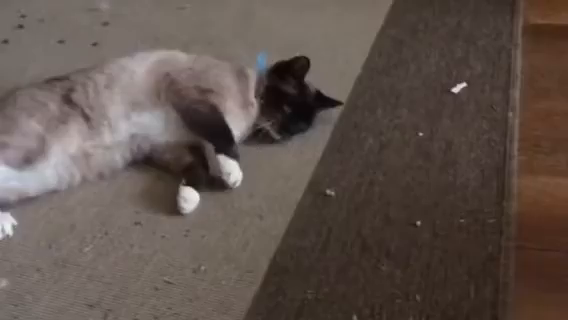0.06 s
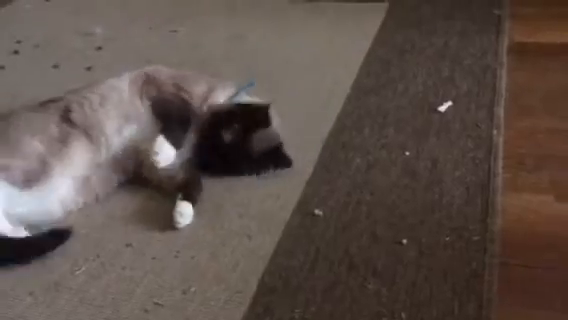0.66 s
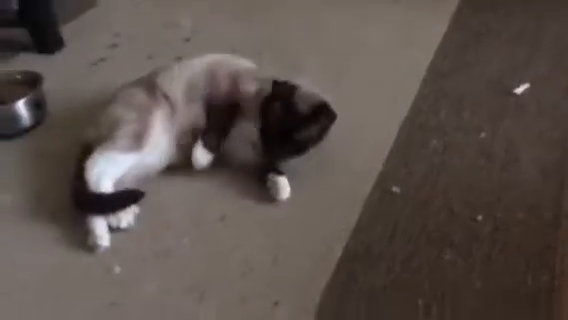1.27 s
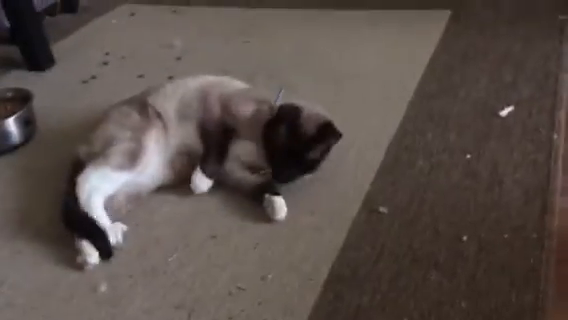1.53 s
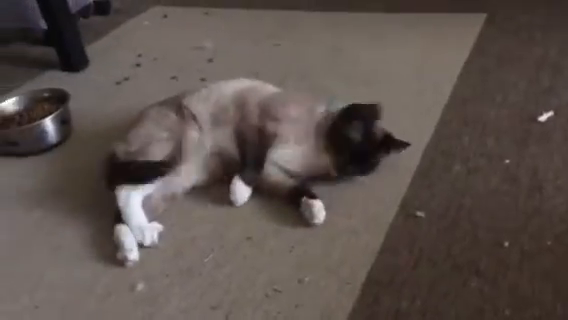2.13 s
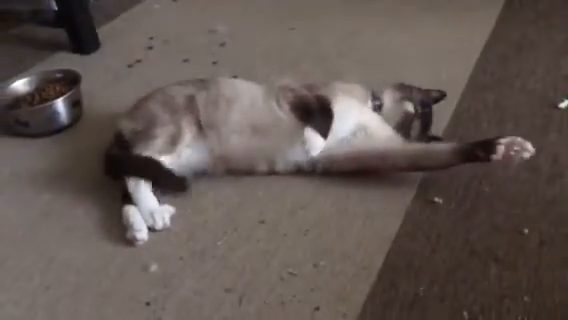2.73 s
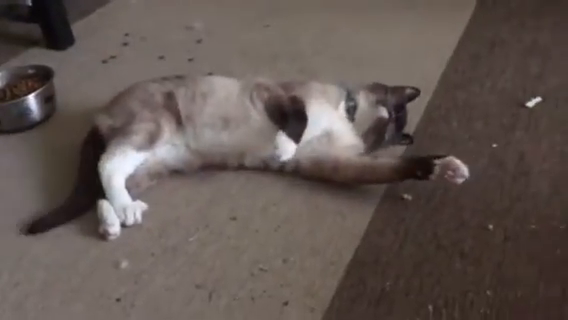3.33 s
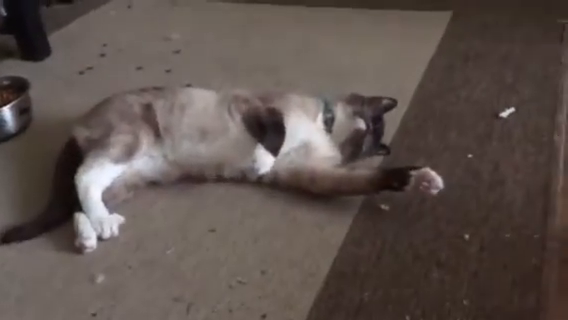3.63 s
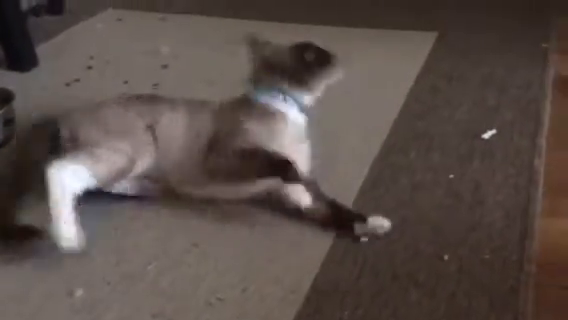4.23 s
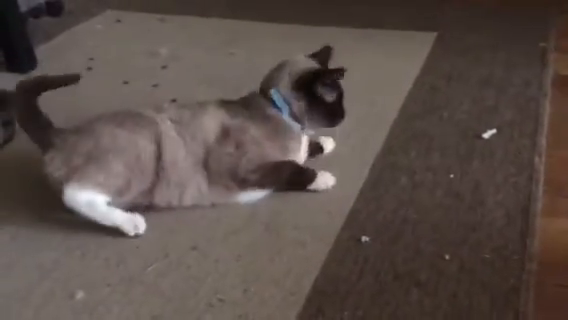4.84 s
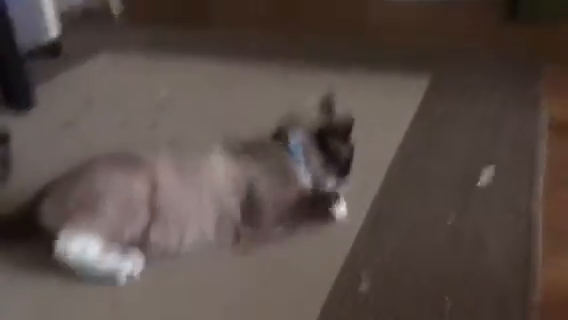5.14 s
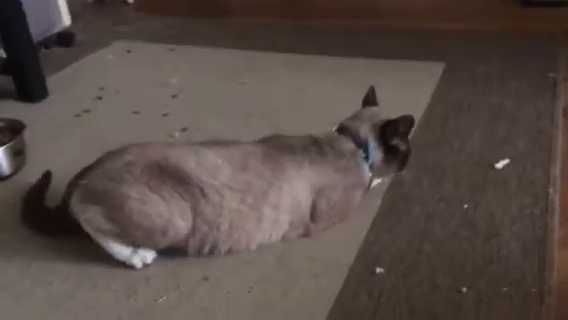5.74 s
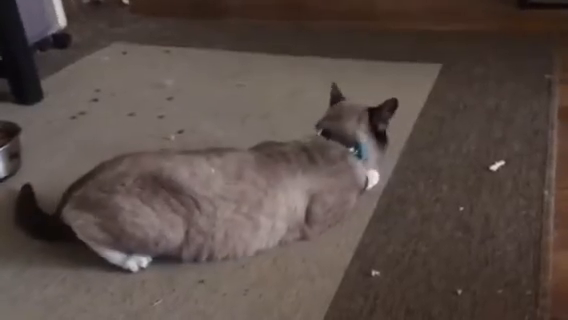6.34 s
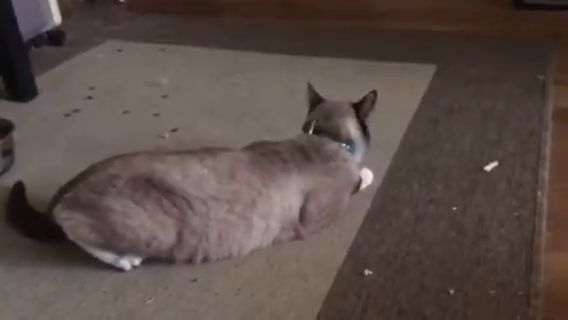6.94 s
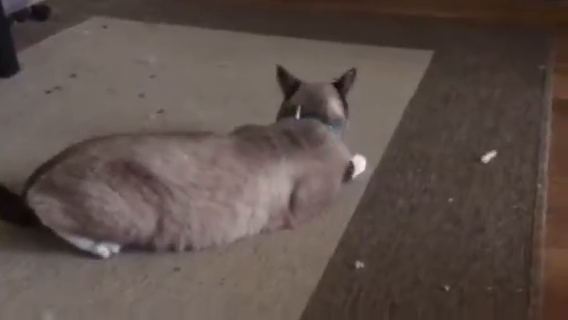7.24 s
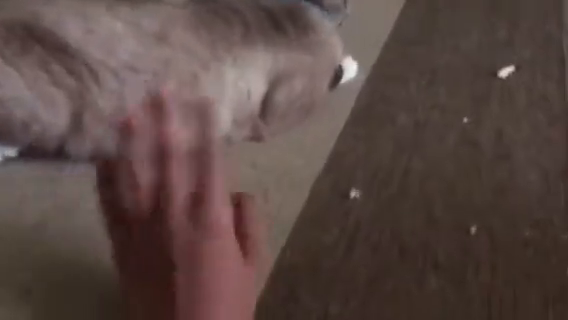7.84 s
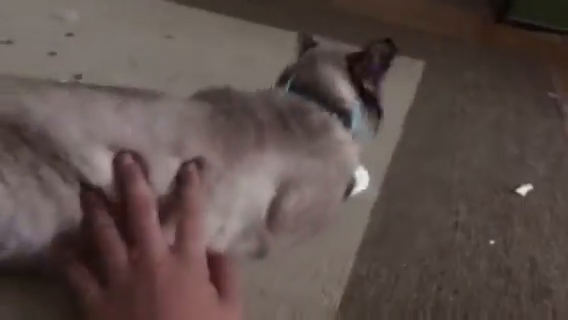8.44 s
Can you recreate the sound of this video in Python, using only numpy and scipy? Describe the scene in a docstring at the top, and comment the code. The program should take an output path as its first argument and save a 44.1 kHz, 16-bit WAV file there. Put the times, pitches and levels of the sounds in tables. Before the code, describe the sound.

A small bell on a cat's collar jingles briefly indoors, amid soft fur rustling, light bumps and a low room hum.

```python
'''A tiny bell on a cat's collar jingles as the cat rolls over on a carpet and sits up.
A loose pellet knocks the slit shell, bounces and rolls inside; the shell rings near 6.5 and 15.3 kHz.
Fur rubs the carpet, paws bump, the buckle clicks, and at the end a sleeve rustles as a hand reaches out.
A hand-held phone hears it all in a small room with mains hum, low rumble and an appliance's rush.'''
import sys
import numpy as np
from scipy import signal
from scipy.fft import rfft, irfft, next_fast_len
from scipy.io import wavfile

SR = 44100
rng = np.random.default_rng(int(sys.argv[2]) if len(sys.argv) > 2 else 0)


def transcribe(signal):
    """Save signal, clipped to [-1, 1], as a 16-bit WAV file at the path in sys.argv[1]."""
    frames = np.atleast_2d(signal).T
    limited = np.clip(frames, -1, 1)
    pcm = np.round(limited * 32767).astype(np.int16)
    wavfile.write(sys.argv[1], SR, pcm)


N = 374409
TIME = np.arange(N) / SR


def gain(db):
    """Turn decibels into a number to multiply by."""
    return 10 ** (np.asarray(db) / 20)


def unit(x):
    """Scale a sound to an average (rms) level of one."""
    return x / np.sqrt(np.mean(x ** 2))


def colour(x, points):
    """Shape a sound's tone with a curve through (pitch_hz, level_db) points."""
    hz, db = np.transpose(points)
    size = next_fast_len(len(x), real=True)
    pitches = np.maximum(np.fft.rfftfreq(size, 1 / SR), 1)
    curve = gain(np.interp(np.log(pitches), np.log(hz), db))
    return irfft(rfft(x, size) * curve, size)[:len(x)]


def band(x, low_hz, high_hz):
    """Keep the part of a sound between two pitches."""
    edges = [low_hz, min(high_hz, SR / 2 - 1)]
    return signal.sosfilt(signal.butter(3, edges, "band", fs=SR, output="sos"), x)


def drift(rate_hz):
    """Glide from one random value to the next, rate_hz times a second."""
    values = rng.standard_normal(int(N / SR * rate_hz) + 2)
    return np.interp(TIME * rate_hz, np.arange(len(values)), values)


def add(out, start_s, sound):
    """Mix a sound in at its start time."""
    i = max(int(start_s * SR), 0)
    out[i:i + len(sound)] += sound[:N - i]


def fade(fade_s):
    """A half-second curve that falls by 60 dB every fade_s seconds."""
    return np.exp(-np.log(1000) * TIME[:SR // 2] / max(fade_s, 1 / SR))


def ring(hz, fade_s, phase=0):
    """One pure tone that dies away."""
    return np.sin(2 * np.pi * hz * TIME[:SR // 2] + phase) * fade(fade_s)


def appliance_rush(treble_hz=1400, treble_drop=0.36):
    """An appliance's rush rings in its casing and swells as the phone turns toward it."""
    # tone of the rush: pitch_hz, level_db
    rush_tone = [(250, -3.5), (480, -5.5), (580, -2.5), (1020, -1), (1300, -7.5), (1650, -5), (2420, -12.5),
                 (2580, -18), (4000, -20), (5500, -26.5), (6500, -24), (7400, -20), (8100, -39.5),
                 (15000, -28.5)]
    # the casing's ringing pitches and faint whine: pitch_hz, width_hz, boost_db
    casing = [(430, 30, 3), (572, 22, 5), (625, 22, 4.5), (800, 25, 4), (965, 55, 4.5), (2290, 55, 8)]
    # loudness as the phone turns: time_s, level_db
    rush_levels = [(0, -66), (1.4, -66.4), (2.7, -61.7), (3.3, -60.7), (4.6, -62), (5.2, -64), (6.6, -63.2),
                   (7.2, -61.2), (8.49, -62.5)]
    air = colour(rng.standard_normal(N), rush_tone)
    rush = air.copy()
    for hz, width_hz, db in casing:
        rush += (gain(db) - 1) * signal.lfilter(*signal.iirpeak(hz, hz / width_hz, SR), air)
    rush /= band(rush, 520, 1150).std()
    level_db = np.interp(TIME, *np.transpose(rush_levels))
    # treble is more directional, so it fades faster as the phone turns away
    treble = colour(rush, [(treble_hz / 2, -40), (treble_hz, 0)])
    rush += treble * (gain(treble_drop * (level_db - level_db.max())) - 1)
    return rush * gain(level_db + 0.5)


def background(rumble_db=-52.5, hum_hz=118.7, hum_db=-59.5, hiss_db=-73.5):
    """The room's wavering rumble and mains hum, the appliance and a thin, even hiss."""
    # tone of the room's rumble: pitch_hz, level_db
    rumble_tone = [(20, -50), (30, -13), (42, 0.5), (60, -2.5), (82, 6), (105, -0.5), (150, -4),
                   (175, -10.5), (198, -5.5), (240, -20.5), (330, -19.5), (600, -45), (3000, -58.5)]
    # tone of the hiss: pitch_hz, level_db
    hiss_tone = [(1000, -7), (3000, 2), (5000, 2), (7200, -8), (8100, -3.5), (9000, -3), (15000, -2.5)]
    rumble = unit(colour(rng.standard_normal(N), rumble_tone)) * gain(rumble_db + 0.5 * drift(7.8))
    hum = np.sqrt(2) * gain(hum_db + 1.2 * drift(1.3)) * np.sin(2 * np.pi * hum_hz * TIME)
    rush = appliance_rush()
    hiss = gain(hiss_db) * unit(colour(rng.standard_normal(N), hiss_tone))
    return rumble + hum + rush + hiss


def stroke(peak_s, hold_s, rise_s=0.33, fade_s=0.72):
    """The loudness of one rub: it swells, holds and dies away."""
    before = np.maximum(peak_s - TIME, 0) / rise_s
    after = np.maximum(TIME - peak_s - hold_s, 0) / fade_s
    return np.exp(-np.log(1000) * (before + after))


def fibres(grain_db=1.5, flutter_db=1.5):
    """Countless fibres catch and slip in uneven bunches."""
    # tone of rubbed fur and cloth: pitch_hz, level_db
    cloth_tone = [(200, -7.5), (350, -11), (600, -13), (1000, -12.5), (1500, -11.5), (2400, -11),
                  (3600, -12.5), (4900, -16.5), (6100, -13.5), (7800, -20), (9200, -18), (11800, -19),
                  (15500, -20.5)]
    slips = rng.standard_normal(N) * gain(grain_db * drift(1500) + flutter_db * drift(45))
    return colour(slips, cloth_tone)


def rustle(split_hz=5500):
    """Pressure gives a rub its body and a dull handling rumble; speed gives it its hiss."""
    # the cat rolls and sits up, then the sleeve reaches out: peak_s, hold_s, body_db, hiss_db
    rubs = [(0, 0.12, -70, -74), (0.167, 0.39, -65.5, -64), (0.367, 0.049, -64.5, -60.5),
            (0.777, 0.48, -76, -71.5), (3.92, .01, -78, -75), (4.177, 0.11, -65.5, -59),
            (4.417, 0.13, -72.5, -67), (7.139, .1, -81, -73.5), (7.259, .05, -71.5, -69),
            (7.361, 0.85, -59.5, -60.5), (7.552, 0.056, -59, -59), (7.95, 0.027, -59, -57.5),
            (8.095, 0.014, -60, -57.5)]
    # tone of the rumble that goes with each movement: pitch_hz, level_db
    handling_tone = [(20, -12.5), (45, -0.5), (90, 3), (190, -7), (300, -19), (2000, -69)]
    power = sum(np.outer(gain(levels), stroke(peak_s, hold_s)) ** 2 for peak_s, hold_s, *levels in rubs)
    pressure, speed = np.sqrt(power)
    body, hiss = fibres(), fibres()
    body = band(body / band(body, 2600, 4500).std(), 220, split_hz)
    hiss = band(hiss / band(hiss, 8000, 15000).std(), split_hz, 19000)
    handling = unit(colour(rng.standard_normal(N), handling_tone))
    return pressure * (gain(0.5) * body + gain(2) * handling) + speed * gain(-1.5) * hiss


def clicks(crack_db=-9, crack_s=0.001):
    """Tapped plastic gives a sharp crack and a very short ring."""
    # taps of the collar buckle and the hand on the phone: start_s, level_db, brightness_db_per_octave
    taps = [(0.1324, -38, -14), (0.134, -54, -18), (4.1566, -28.5, 4), (4.166, -34, 3), (4.2149, -38, 0),
            (4.321, -36, 0), (4.536, -41, 1), (4.8539, -22, -4), (4.864, -44, 4), (4.872, -42, -3),
            (5.328, -44, 10), (8.034, -33, 18), (8.313, -41, 14), (8.426, -46.5, 12)]
    # the plastic's ringing tones: pitch_hz, level_db, fade_s
    plastic = [(1620, -15, 0.0067), (3760, -1.5, 0.0058), (4380, -1, 0.0046), (5800, 0, 0.005),
               (9110, -14, 0.0031), (11870, -11.5, 0.00382)]
    pivot_hz = plastic[1][0]
    out = np.zeros(N)
    for start_s, db, brightness in taps:
        tones = sum(gain(tone_db + brightness * np.log2(hz / pivot_hz)) * ring(hz, fade_s)
                    for hz, tone_db, fade_s in plastic)
        crack = band(rng.standard_normal(SR // 2) * fade(crack_s), 1202, 12000)
        add(out, start_s, gain(db) * (tones / np.abs(tones).max() + gain(crack_db) * crack))
    return band(out, 1163, 18000)


def knock_and_brushes():
    """Short bursts of noise: the knock of the buckle's snap, and brushes of paws, fur and cloth."""
    # the knock, then the brushes: peak_s, level_db, rise_s, fade_s, pitch_hz, half_width_octaves
    bursts = [(0.134, -49.5, 0.00097, .05, 1600, 1.3), (0.271, -57, 0.028, 0.57, 330, 1.1),
              (.405, -55, 0.087, .25, 1900, 0.58), (2.36, -66.5, 0.035, 0.075, 10300, .25),
              (2.525, -54.5, 0.011, 0.24, 9500, 2.5), (4.958, -66, .003, 0.073, 9150, .12),
              (5.346, -54.5, 0.019, 0.044, 9000, 3.5), (7.48, -54.5, 0.18, 0.85, 1195, 0.5),
              (8.12, -57, 0.13, 0.8, 554, 0.77)]
    out = np.zeros(N)
    for peak_s, db, rise_s, fade_s, hz, octaves in bursts:
        swell = np.concatenate([np.linspace(0, 1, int(rise_s * SR) + 2), fade(fade_s)])
        noise = band(rng.standard_normal(SR)[:len(swell)], hz / 2 ** octaves, hz * 2 ** octaves)
        add(out, peak_s - rise_s, gain(db) * unit(noise) * swell)
    return out


def thumps(fade_s=0.13, low_hz=125, high_hz=280):
    """Body, paws and hand land on the carpeted floor with soft, dull thuds."""
    # bumps on the floor: start_s, level_db
    bumps = [(0.257, -45), (0.328, -51), (.435, -48.5), (1.005, -52), (1.097, -49), (1.961, -53),
             (4.156, -44.5), (4.38, -52), (4.485, -49), (7.638, -49.5), (7.742, -47), (8.12, -47.5)]
    out = np.zeros(N)
    for start_s, db in bumps:
        thud = unit(band(rng.standard_normal(SR // 2), low_hz, high_hz))
        add(out, start_s, gain(db) * thud * fade(fade_s))
    return band(out, low_hz / 2, high_hz * 2)


def pellet_strikes(bounce_s=0.008, bounce_db=-16.5):
    """The pellet hits the shell and bounces once. Each knock: start_s, low_db, press, high_db, tick_db."""
    # clear hits: start_s, strength_db, press (0-1, how firmly the pellet stays on), brightness_db
    strikes = [(2.4305, -58, 0.04, -20), (4.0545, -57.5, 0, -0.5), (4.0661, -56.5, 0, 2),
               (4.0813, -43.5, 0.3, -3.5), (4.0945, -38.5, 0.08, -7), (4.1165, -41.5, 0, -4),
               (4.1235, -42, 0, -2), (4.1312, -33.5, 0.67, -6.5), (4.178, -25, 0.7, -15.5),
               (4.1982, -21, 0.5, -17), (4.215, -39, .5, 0.5), (4.2667, -34.5, 0, -7),
               (4.284, -25, 0.5, -13.5), (4.2916, -9.5, .1, -12.5), (4.311, -20.5, 0.9, -21.5),
               (4.3216, -25, 0.56, -6), (4.326, -28, .3, -3), (4.3997, -29, 0, -13), (4.4067, -28, 0, -8),
               (4.4107, -17, 0.16, -11), (4.417, -19, 0.7, -17), (4.4889, -45, .4, 2),
               (4.502, -26.5, .7, -11.5), (4.5155, -32.5, 0.8, -4.5), (4.5339, -18.5, 0.07, -6),
               (4.5365, -19, 0.09, -11.5), (4.552, -26, .55, -26.5), (4.5855, -43, 0.02, -15),
               (4.609, -42, 0.1, -10), (4.662, -29.5, 0.16, -16), (4.6732, -37, 0, -15),
               (4.7127, -31, 0.01, -15.5), (5.117, -51, 0.03, -17), (5.304, -37.5, 0.04, -19),
               (5.311, -42, 0.01, -14)]
    for start_s, db, press, brightness_db in strikes:
        high_db = db + brightness_db
        tick_db = 0.87 * db - 0.5 + brightness_db  # the tick stands out most in light hits
        yield start_s, db, press, high_db, tick_db
        again_s = start_s + bounce_s * (0.5 + rng.random())
        yield again_s, db + bounce_db, press / 2, high_db + bounce_db, tick_db + bounce_db


def pellet_rolls(count=8, scatter_db=4, slowing_db=-6):
    """The rolling pellet grazes the shell as it slows. Knocks are listed as in pellet_strikes."""
    # swings of the collar that set the pellet rolling: start_s, length_s, strength_db
    swings = [(4.111, 0.13, -40), (4.301, .085, -32), (4.427, 0.093, -38.5), (4.501, 0.14, -38.5)]
    for start_s, length_s, db in swings:
        for k, (late, force, firmness, glance) in enumerate(rng.random((count, 4))):
            progress = (k + late / 2) / count
            low_db = db + slowing_db * progress + scatter_db * (2 * force - 1)
            high_db = low_db + 2 + scatter_db * (2 * glance - 1)
            yield start_s + length_s * progress, low_db, 0.42 * firmness ** 2, high_db, low_db - 7


def bell(low_hz=6420, high_hz=15300, contact_s=0.001, chatter_db=-22):
    """Each knock gives a tick, a clank cut short by the pellet, a skidding chatter and a faint ring."""
    # shell tones that ring on once the pellet is clear: pitch_hz, level_db, fade_s
    shell = [(6330, -32, .2), (6400, -27, .25), (6455, -28, .25), (15142, -19, .24), (15350, -15.5, .2)]
    # tone of the pellet's tick and chatter: pitch_hz, level_db
    tick_tone = [(1500, -25.5), (2600, -9.5), (3500, -15), (4900, -18.5), (5700, -18), (6400, 6.5),
                 (7100, 15.5), (8100, 5.5), (9200, 3.5), (10400, -3.5), (12800, -1), (14500, -3.5),
                 (16000, -4)]
    rings, ticks = np.zeros(N), np.zeros(N)
    for start_s, low_db, press, high_db, tick_db in [*pellet_strikes(), *pellet_rolls()]:
        low_shift, high_shift, *places = rng.standard_normal(len(shell) + 2)
        # a pressing pellet raises the pitch; pressing or a hard hit shortens the ring
        clank_hz = low_hz + 650 * press + 40 * low_shift
        clank_s = 0.071 / (1 + 3.8 * press + 6.2 * gain(low_db))
        tones = gain(low_db + 1) * ring(clank_hz, clank_s)
        tones += gain(high_db - 2) * ring(high_hz + 120 * high_shift, fade_s=0.042)
        # where the pellet lands decides how close tones pulse against each other
        for (hz, db, fade_s), place in zip(shell, places):
            hit_db = high_db if hz > high_hz / 2 else low_db
            tones += gain(hit_db + db) * ring(hz, fade_s, phase=np.pi * place)
        add(rings, start_s, tones * (1 - fade(contact_s)))
        tick_and_chatter = fade(0.0029) + gain(chatter_db) * fade(0.06)
        add(ticks, start_s, gain(tick_db + 5) * rng.standard_normal(SR // 2) * tick_and_chatter)
    # so small a shell gives off little sound below its lowest tone
    return band(band(rings, 5200, 20000), 5214, 20000) + colour(ticks, tick_tone)


def room(x, echo_db=-10.5, build_s=0.003, fade_s=0.3):
    """Echoes from floor and furniture blur into a short tail."""
    build = 1 - np.exp(-(TIME[:SR // 2] / build_s) ** 2)
    tail = rng.standard_normal(SR // 2) * fade(fade_s) * build
    echoes = gain(echo_db) * tail / np.linalg.norm(tail)
    return x + signal.fftconvolve(x, echoes)[:N]


def scene():
    """The cat and the hand in the room, as one channel."""
    contacts = bell() + clicks() + knock_and_brushes() + thumps()
    return (room(contacts) + rustle() + background())[None]


def record(dry, top_hz=15750):
    """The phone's microphone opening puts two shallow dips in the tone; the highest treble is cut."""
    # tone of the opening: pitch_hz, level_db
    opening = [(4200, -1.5), (4900, -3.0), (5600, -1.5), (9700, 1), (10400, -3.5), (11000, 0)]
    heard = np.array([colour(channel, opening) for channel in dry])
    return signal.sosfilt(signal.ellip(10, .2, 70, top_hz, fs=SR, output="sos"), heard)


dry = scene()
out = record(dry)
transcribe(out)
```